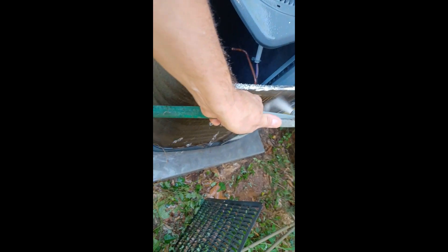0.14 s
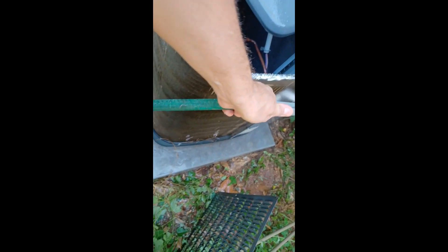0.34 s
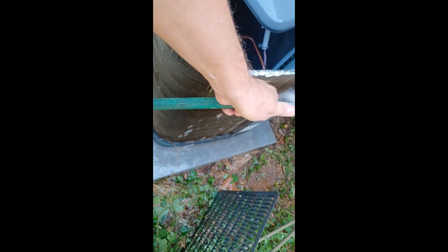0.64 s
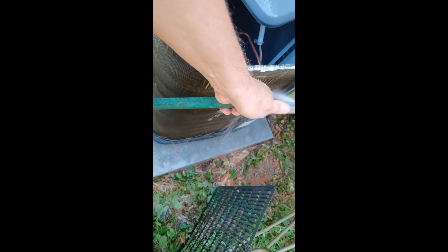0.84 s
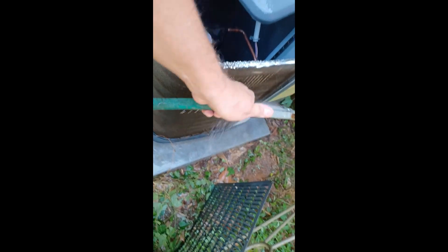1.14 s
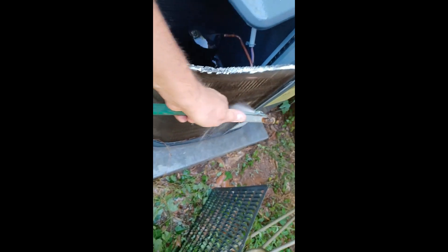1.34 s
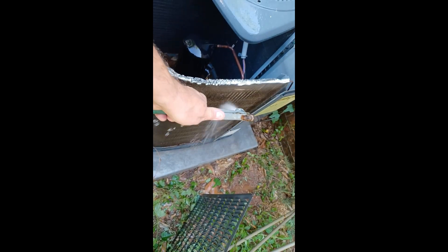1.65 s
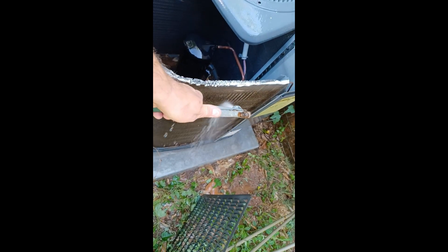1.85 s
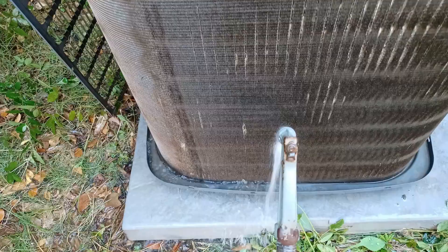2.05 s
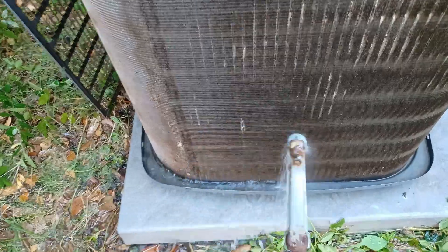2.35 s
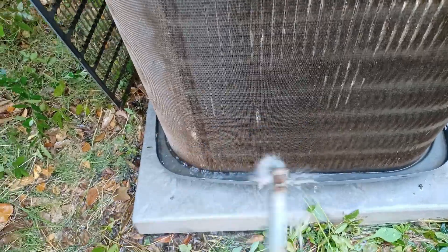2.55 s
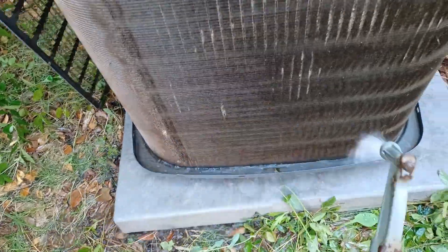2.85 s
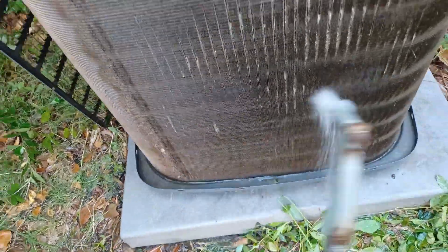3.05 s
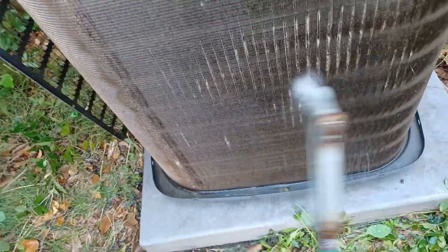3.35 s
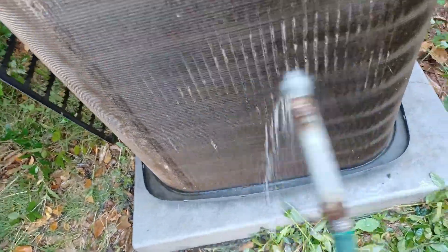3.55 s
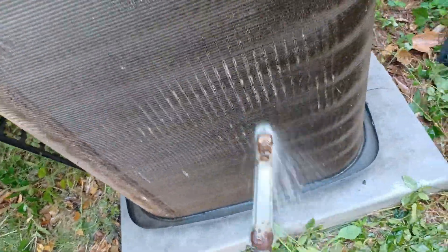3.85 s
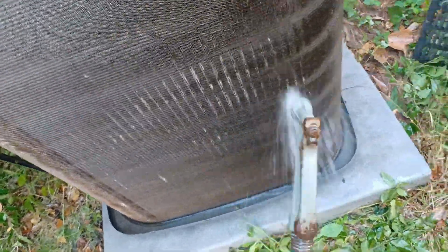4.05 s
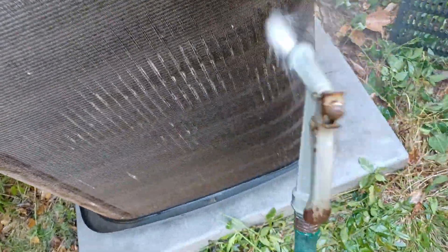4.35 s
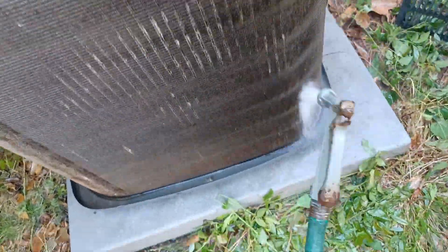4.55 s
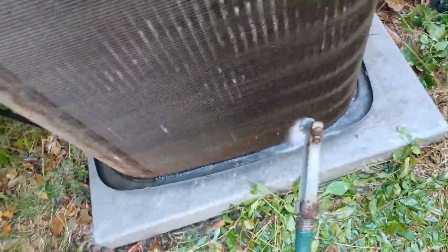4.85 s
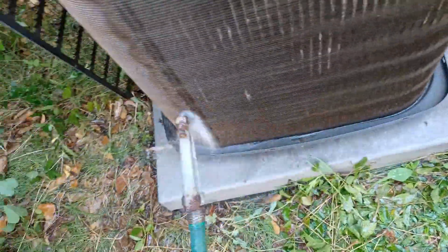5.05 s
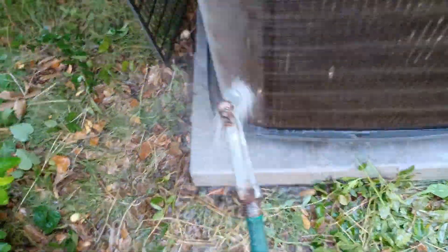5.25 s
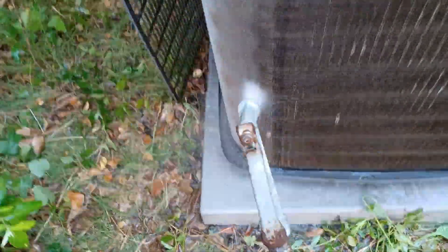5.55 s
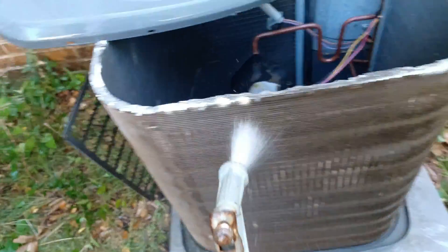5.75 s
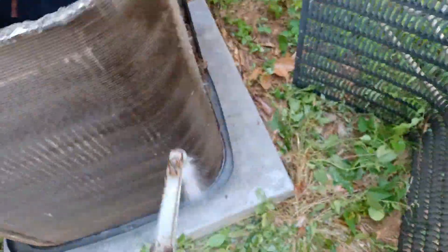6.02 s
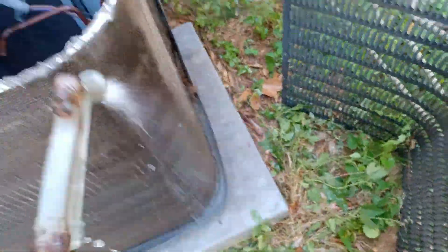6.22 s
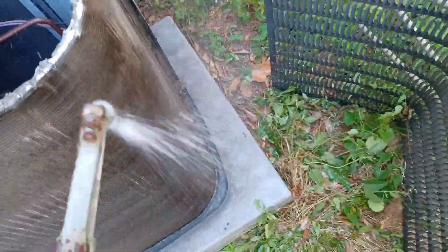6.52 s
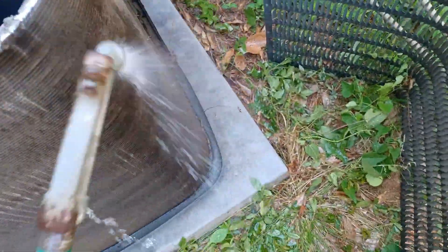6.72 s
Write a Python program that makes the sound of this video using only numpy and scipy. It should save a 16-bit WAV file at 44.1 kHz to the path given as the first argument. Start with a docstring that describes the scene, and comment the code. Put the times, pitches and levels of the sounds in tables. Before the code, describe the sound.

A pressurized water jet hisses steadily over thin metal fins, then sweeps back and forth with splashy swells and brief ringing knocks on a metal tray.

```python
"""A hose jet sweeps the fins and drums on the casing of an outdoor air conditioner, close to a hand-held port pair.
At 2.08 s an edit: a short fade-in, another left-right balance, and a drifting phase between the channels.
From 2.6 s strikes on ribs and base tray ring among the sweeps, loudest in the tray at 5.2 and 5.5 s; sweeps end it.
Random droplets, shaped by metal resonances or splash spectra, make each layer; crossings of edges swell it.
A far machine hums throughout: a wandering tone in low noise, whose level dips at 2.8 and 3.7 s."""
import sys
import numpy as np
from scipy import signal
from scipy.fft import rfft, irfft
from scipy.io import wavfile
from scipy.ndimage import uniform_filter1d

SR = 44100
rng = np.random.default_rng(int(sys.argv[2]) if len(sys.argv) > 2 else 0)


def unload_audio(sound):
    """Save the sound as a 16-bit wav file, at the path given as the first command line argument."""
    columns = np.transpose(np.atleast_2d(sound))
    # keep every value between -1 and 1, then stretch to whole-number steps
    steps = np.round(np.clip(columns, -1, 1) * 32767)
    wavfile.write(sys.argv[1], SR, steps.astype(np.int16))


def natural_amplitude(level_db):
    """Convert a level in decibels to a linear amplitude factor, elementwise."""
    exponent = np.asarray(level_db, float) / 20
    return 10 ** exponent


N = 303408
T = np.arange(N) / SR
HZ = np.fft.rfftfreq(N, 1 / SR)
EDIT_S = 2.0822

# Level of the spray over time; the mist dips abruptly and briefly at 6.42 s.
# Each row: time in seconds, fin ring in dB, mist in dB.
SPRAY_LEVEL = [(0.0, -31.5, -29.5), (0.45, -33.5, -30), (0.7, -32, -28.5), (1.06, -35.5, -29),
               (1.3, -34, -28.5), (2.08, -32.5, -29.5), (2.4, -34.5, -30), (2.7, -38, -32),
               (3.0, -34.5, -31), (3.6, -33.5, -28.5), (3.9, -34, -32.5), (4.45, -32.5, -29),
               (4.75, -36, -32.5), (5.1, -36.5, -33), (5.6, -39.5, -34), (5.82, -38, -33), (5.9, -34, -30),
               (6.38, -34, -30.5), (6.42, -34.5, -42), (6.5, -36, -30), (6.88, -34, -30.5)]
# Resonances of casing, base tray (deep mode first), ribs and fins.
# Each row: frequency in Hz, width in Hz, relative level in dB.
CASING_MODES = [(350, 40, 0), (420, 70, -8)]
TRAY_MODES = [(703, 38, 0), (900, 40, -5), (1010, 45, -2), (1190, 45, 0), (1500, 50, -9)]
RIB_MODES = [(784, 180, -11), (1110, 230, -2.5), (1470, 210, 3.5), (1590, 110, 0.5)]
FIN_MODES = [(1720, 160, -16), (2085, 505, 2), (2376, 75, 0.5), (2597, 210, 1.5), (2850, 61, 2.5),
             (3300, 570, -1.5), (4030, 870, -1)]
# Spectra of water patter, splash and mist. Each row: frequency in Hz, relative level in dB.
PATTER_SPECTRUM = [(300, -31), (500, -7.5), (750, 0.5), (1250, -0.5), (1550, 3), (2200, -12), (4000, -50)]
SPLASH_SPECTRUM = [(1500, -30), (3000, -10.5), (4400, -5.5), (6500, -6), (8300, -7.5), (10500, -16)]
MIST_SPECTRUM = [(6000, -31), (8500, -1), (10500, 4), (12800, 6), (14500, 4), (15400, 2), (16300, -9)]
PATTER_RE_FINS_DB, SPLASH_RE_MIST_DB = -8.5, -1
BOOM_BEFORE_DB, BOOM_AFTER_DB = -47, -52.5  # steady casing boom, either side of the edit
RUNOFF_DB = -51  # steady patter of water running down


def jet():
    """Droplets excite casing, tray, ribs and fins, and hiss as they burst."""
    s, fins_db, mist_db = np.transpose(SPRAY_LEVEL)
    fins = np.interp(T, s, natural_amplitude(fins_db) ** 2)
    mist = np.interp(T, s, natural_amplitude(mist_db) ** 2)
    boom = natural_amplitude(np.where(T < EDIT_S, BOOM_BEFORE_DB, BOOM_AFTER_DB)) ** 2
    patter = fins * natural_amplitude(PATTER_RE_FINS_DB) ** 2
    splash = mist * natural_amplitude(SPLASH_RE_MIST_DB) ** 2
    more_boom, deep, upper, ribs, more_fins, more_splash, more_mist = crossings()
    # strong patter rings the ribs: this share of its power moves to them
    hard = np.clip((10 * np.log10(patter) + 42) / 9, 0, 0.7)
    soft_patter = (1 - hard) * patter + natural_amplitude(RUNOFF_DB) ** 2
    layers = [(boom + more_boom, modes(CASING_MODES)),
              (deep, modes(TRAY_MODES[:1], steep=1.25)),
              (upper, modes(TRAY_MODES[1:], steep=1.1)),
              (ribs + hard * patter, modes(RIB_MODES)),
              (soft_patter, natural_amplitude(read(PATTER_SPECTRUM, HZ))),
              (fins + more_fins, modes(FIN_MODES)),
              (splash + more_splash, natural_amplitude(read(SPLASH_SPECTRUM, HZ))),
              (mist + more_mist, natural_amplitude(read(MIST_SPECTRUM, HZ)))]
    return sum(np.sqrt(power) * droplets(colour) for power, colour in layers)


# The jet drums on the casing.
# Each row: centre in seconds, length in seconds, boom in dB, fin ring in dB, mist in dB.
CASING_SURGES = [(0.909, 0.24, -37.5, -32, -26), (1.159, 0.15, -41.5, -34, -25)]
SURGE_RIBS_RE_FINS_DB, SURGE_SPLASH_RE_MIST_DB = 1, -10
# The jet strikes a rib or the tray. Each row: centre in seconds, length in seconds,
# deep tray mode in dB, upper tray modes in dB, rib ring in dB, fin ring in dB, mist in dB.
RIB_TRAY_STRIKES = [(2.605, 0.12, -70, -55, -36.5, -26.5, -33), (2.74, 0.12, -41, -43, -38.5, -28, -32),
                    (4.832, 0.041, -50, -40.5, -40, -29.5, -34), (4.947, 0.24, -47, -38, -45, -27.5, -36.5),
                    (5.213, 0.041, -21.5, -27.5, -28, -27, -28), (5.408, 0.053, -36, -35, -40, -28, -28),
                    (5.508, 0.067, -26, -25, -26.5, -26.5, -27.5),
                    (6.446, 0.048, -47, -41, -39, -34.5, -29.5), (6.719, 0.038, -59, -50, -35, -30, -30)]
STRIKE_SPLASH_RE_MIST_DB = -6
STRIKE_FLAT, TRAY_FLAT = 1.17, 1.2  # swell overdrive, clipped to a flat top
TRAY_LATER_S, TRAY_LENGTH_SHARE = 0.0055, 0.83  # the jet reaches the tray later, for part of a strike
# The wagging jet sweeps the fins. Each row: centre in seconds, length in seconds, fin ring in dB, mist in dB.
FIN_SWEEPS = [(0.17, 0.095, -35.5, -44), (0.569, 0.021, -50, -24.5), (0.618, 0.052, -29.5, -38),
              (0.667, 0.053, -33, -33), (0.828, 0.075, -46, -28.5), (1.277, 0.08, -52, -31),
              (1.526, 0.19, -42, -37), (2.47, 0.062, -28.5, -47), (2.91, 0.15, -41, -42),
              (3.064, 0.1, -34, -32), (3.393, 0.075, -34.5, -32), (3.737, 0.16, -35, -31),
              (3.867, 0.073, -35, -28.5), (3.953, 0.12, -34, -31.5), (4.07, 0.074, -38, -27.5),
              (4.167, 0.083, -35, -30.5), (4.27, 0.1, -31, -31.5), (4.39, 0.12, -34, -34),
              (4.49, 0.096, -36, -34), (5.29, 0.069, -36, -36), (5.327, 0.031, -27, -35),
              (6.195, 0.066, -33.5, -44), (6.31, 0.12, -36, -34), (6.54, 0.055, -32.5, -32),
              (6.63, 0.099, -34, -30.5), (6.799, 0.015, -27, -29)]
SWEEP_RIBS_RE_FINS_DB, SWEEP_SPLASH_RE_MIST_DB = -11.5, -0.5
SPUTTER_RMS_DB = 1.5  # the jet breaks up while it crosses an edge


def crossings():
    """Power of boom, deep and upper tray, ribs, fins, splash, mist; each swell stops a little faster than it grows."""
    power = np.zeros((7, N))

    def cross(s, length, heights, flat=1.0):
        near = slice(max(round((s - length) * SR), 0), round((s + length) * SR))
        progress = np.clip((T[near] - s) / length + 0.46, 0, 1) ** 1.2
        swell = np.clip(flat * np.sin(np.pi * progress), 0, 1)
        power[:, near] += np.array(heights)[:, None] ** 2 * swell ** 2

    for s, length, *db in CASING_SURGES:
        boom, fins, mist = natural_amplitude(db)
        ribs, splash = fins * natural_amplitude(SURGE_RIBS_RE_FINS_DB), mist * natural_amplitude(SURGE_SPLASH_RE_MIST_DB)
        cross(s, length, [boom, 0, 0, ribs, fins, splash, mist])
    for s, length, *db in RIB_TRAY_STRIKES:
        deep, upper, ribs, fins, mist = natural_amplitude(db)
        splash = mist * natural_amplitude(STRIKE_SPLASH_RE_MIST_DB)
        cross(s + TRAY_LATER_S, length * TRAY_LENGTH_SHARE, [0, deep, upper, 0, 0, 0, 0], TRAY_FLAT)
        cross(s, length, [0, 0, 0, ribs, fins, splash, mist], STRIKE_FLAT)
    for s, length, *db in FIN_SWEEPS:
        fins, mist = natural_amplitude(db)
        ribs, splash = fins * natural_amplitude(SWEEP_RIBS_RE_FINS_DB), mist * natural_amplitude(SWEEP_SPLASH_RE_MIST_DB)
        cross(s, length, [0, 0, 0, ribs, fins, splash, mist])
    sputter = np.array([slow(count=N, size=250) for _ in power])
    return power * natural_amplitude(SPUTTER_RMS_DB * sputter) ** 2


# Likeness of the two ports. Each row: frequency in Hz, correlation from 0 to 1.
PORT_LIKENESS = [(100, .95), (250, .96), (600, .87), (1200, .8), (2200, .55), (2700, .93), (3200, .95),
                 (3800, .6), (5000, .7), (6500, .75), (7800, .92), (8600, .85), (9500, .45), (13000, .3)]
DROPS_PER_S, DROP_SPREAD_DB = 14000, 2.0


def droplets(colour):
    """A dense rain of impacts of uneven size, for two ports that hear partly the same drops."""
    size = natural_amplitude(DROP_SPREAD_DB * np.minimum(rng.exponential(1, (2, N)), 5))
    falls = rng.random((2, N)) < DROPS_PER_S / SR
    shared, other = rfft(size * rng.standard_normal((2, N)) * falls)
    same = np.clip(read(PORT_LIKENESS, HZ), 0, 1)
    second = same * shared + np.sqrt(1 - same ** 2) * other
    return evened(irfft(colour * np.array([shared, second]), N))


def modes(table, steep=0.87):
    """Magnitude of a set of resonances, summed in power; steep sets the fall of the skirts."""
    return np.sqrt(sum(natural_amplitude(db) ** 2 / (1 + (2 * (HZ - hz) / width) ** 2) ** steep
                       for hz, width, db in table))


# Noise of the far machine. Each row: frequency in Hz, relative level in dB.
HUM_SPECTRUM = [(25, -55), (45, -27), (80, -6), (105, -2.5), (120, -12), (140, 1.5), (190, -9), (245, -1.5),
                (300, -11.5), (450, -68)]
# Level of the hum as heard, with brief dips at 2.8 and 3.7 s, before a small random variation.
# Each row: time in seconds, level in dB.
HUM_HEARD_LEVEL = [(0.0, -47.5), (1.3, -45.5), (2.6, -45.5), (2.8, -55), (3.03, -45.5), (3.55, -44),
                   (3.7, -53.5), (4.2, -45.5), (5.35, -49.5), (5.9, -47.5), (6.88, -44)]
HUM_HZ, HUM_WANDER_SHARE, HUM_VARY_DB = 120, 0.0393, -0.5  # mean pitch, rms pitch wander, level variation


def hum():
    """A rough low drone around an unsteady tone; its heard level follows a table with dips, varied a little at random."""
    pitch_hz = HUM_HZ * (1 + HUM_WANDER_SHARE * slow(count=N, size=1500))
    tone = np.sin(2 * np.pi * np.cumsum(pitch_hz) / SR)
    level_db = np.interp(T, *np.transpose(HUM_HEARD_LEVEL)) + HUM_VARY_DB * slow(count=N, size=3000)
    return natural_amplitude(level_db) * (tone + droplets(natural_amplitude(read(HUM_SPECTRUM, HZ))))


def evened(x):
    """Scales to rms 1."""
    return x / np.sqrt(np.mean(abs(x) ** 2) + 1e-20)


def read(points, hz):
    """A spectrum table, straight on a log-frequency axis."""
    f, value = np.transpose(points)
    return np.interp(np.log(hz + 1), np.log(f + 1), value)


def slow(count, size):
    """Smooth random wander, rms 1; size in points."""
    return evened(uniform_filter1d(uniform_filter1d(rng.standard_normal(count), size=size), size=size))


def patches(shape, bins, frames):
    """A smooth random field over frequency and time, rms 1."""
    field = rng.standard_normal(shape)
    for _ in range(2):
        field = uniform_filter1d(uniform_filter1d(field, bins, 0), frames, 1)
    return evened(field)


# A thin band in the treble wanders, and spreads while the nozzle swings; values before the shake.
# Each row: time in seconds, centre in Hz, depth in dB, half-width as a share of the centre.
THIN_BAND = [(0, 7860, -1, .1), (.15, 7700, -4, .1), (.3, 8300, -4.5, .14), (.45, 7900, -3, .14),
             (.54, 8000, -1.5, .12), (.57, 6300, -6, .3), (.6, 8600, -5, .08), (.71, 8500, -5, .1),
             (.74, 7500, -3, .2), (.82, 7600, -3.5, .15), (.87, 5900, -8, .28), (.92, 5600, -6, .18),
             (.96, 7600, -8, .12), (1.01, 7900, -5, .1), (1.07, 6900, -6, .12), (1.14, 5600, -5, .25),
             (1.18, 6400, -6, .14), (1.27, 7600, -9, .1), (1.4, 7850, -5, .08), (1.67, 7700, -5, .14),
             (1.85, 7850, -4, .08), (1.9, 7800, -1.5, .1), (2.07, 7850, -1, .1), (2.1, 4600, -3, .14),
             (3.7, 4200, -3, .14), (4.5, 4100, -3, .12), (5.6, 4200, -3, .14), (6.88, 4100, -4, .12)]
HAND_SHAKE = rng.standard_normal((2, 300))  # trembling hand, about 45 random points a second
CENTRE_SHAKE_SHARE, DEPTH_FLICKER_SHARE = 0.045, 0.4


def hollow(t):
    """Centre, depth and width of the thin band, shaken by the hand."""
    s, *columns = np.transpose(THIN_BAND)
    centre_hz, depth_db, share = (np.interp(t, s, c) for c in columns)
    move, flicker = (np.interp(t, np.linspace(0, T[-1], len(c)), c) for c in HAND_SHAKE)
    centre_hz = centre_hz * (1 + CENTRE_SHAKE_SHARE * move)
    depth_db = depth_db * np.clip(1 + DEPTH_FLICKER_SHARE * flicker, 0, 2)
    return centre_hz, depth_db, share


# Brief lifts of one frequency region; 0 dB leaves it unchanged.
# Each row: centre in seconds, length in seconds, frequency in Hz, width in Hz, lift in dB.
REGION_LIFTS = [(.25, 0.38, 2450, 600, 2.5), (0.616, 0.05, 1520, 200, 13), (0.924, .08, 350, 120, 6),
                (0.972, 0.063, 4600, 2000, 7), (1.2, 0.053, 4800, 2000, 5), (2.475, .05, 2100, 300, 7),
                (2.48, .04, 3200, 300, 8), (2.59, .04, 2100, 300, 4), (2.627, 0.049, 1540, 250, 11),
                (2.628, 0.036, 2790, 200, 9), (2.725, 0.017, 2280, 400, 8), (2.77, 0.069, 2340, 300, 6),
                (2.77, .06, 3800, 400, 0), (4.4, .4, 2340, 800, 2.5), (5.22, .04, 1200, 150, 8.5),
                (5.88, 0.07, 3000, 2000, 0), (4.945, 0.13, 2100, 350, 4.5), (5.197, 0.032, 2350, 300, 14),
                (5.406, .05, 2600, 300, 4), (5.522, .05, 2090, 400, 8), (6.71, 0.035, 1720, 200, 11)]
PATCH_RMS_DB, FLICKER_RMS_DB = 0.73, 0.68  # small patches of colour, wide flicker


def scene():
    """The spray thickens and thins in small patches and has a thin treble band; the drone lies under it."""
    hz, t, z = signal.stft(jet(), SR, nperseg=512, noverlap=384)
    hz = hz[:, None]
    small = PATCH_RMS_DB * patches(z.shape[1:], bins=5, frames=16)
    wide = FLICKER_RMS_DB * patches(z.shape[1:], bins=120, frames=3)
    z *= natural_amplitude(small + wide)
    for s, length, lift_hz, width, lift_db in REGION_LIFTS:
        z *= natural_amplitude(lift_db * np.exp(-(2 * (hz - lift_hz) / width) ** 2 - (2 * (t - s) / length) ** 2))
    centre_hz, depth_db, share = hollow(t)
    z *= natural_amplitude(depth_db * np.exp(-((hz / centre_hz - 1) / share) ** 2))
    spray = signal.istft(z, SR, nperseg=512, noverlap=384)[1][:, :N]
    return spray + hum()


# Port balance before and after the edit. Each row: frequency in Hz, left minus right in dB.
BALANCE_BEFORE = [(100, -2), (350, 0), (600, 2), (1000, -3), (1600, -4), (2100, -3.5), (2500, -7),
                  (2900, 4), (3300, -1), (3800, 1.5), (4700, -0.5), (6200, 1), (8000, 0.5), (10000, -8.5),
                  (13500, -0.5), (15700, -7)]
BALANCE_AFTER = [(100, -4.5), (500, -0.5), (900, -5), (1500, -5), (1900, -8), (2300, -9.5), (3200, -6),
                 (4300, -0.5), (5200, 0.5), (6800, -2.5), (8500, -2), (11000, -4.5), (13500, -1.5),
                 (15700, -4)]
# The jet moves across; -2 dB is neutral. Each row: time in seconds, left minus right in dB.
JET_ACROSS = [(0.0, -4), (1.22, -5.5), (2.2, -2), (4.5, -2), (4.92, -3.5), (5.6, -1.5), (6.48, -1),
              (6.88, 0.5)]


def port_balance_db(hz, t, after):
    """Shading between the ports; the move of the jet counts fully from 1500 Hz up."""
    across_db = np.interp(t, *np.transpose(JET_ACROSS)) + 2
    still_db = np.where(after, read(BALANCE_AFTER, hz), read(BALANCE_BEFORE, hz))
    return still_db + across_db * np.clip(hz / 1500, 0, 1)


# Phase scatter of a wide source. Each row: frequency in Hz, rms scatter in radians before the width factor.
PHASE_SCATTER = [(200, .1), (800, .5), (2100, .9), (2700, .35), (3300, .3), (3800, 1.2), (6500, 1.5),
                 (8800, 1.8), (14000, 2.5)]
# The spray's width varies, widest at 0.6 to 1.0 s, narrowest by 2.08 s.
# Each row: time in seconds, factor on the scatter above 2500 Hz.
SPRAY_WIDTH = [(0, 1.9), (.53, 1.5), (.6, 2.6), (1.0, 2.4), (1.05, 1.0), (1.13, 1.8), (1.24, 1.0),
               (1.35, 1.8), (1.55, 1.3), (1.7, .6), (2.08, .4)]
# Lead of the left port on top of the delay. Each row: frequency in Hz, lead in radians.
LEFT_PHASE_LEAD = [(300, 0.01), (550, -0.066), (800, -1.1), (1100, 0.036), (1500, -0.99), (2000, -1.3),
                   (2300, -.5), (2600, 0.15), (2900, .05), (3200, -.5), (3500, -.9), (3900, -.3), (4500, 0)]
# Delay of the right port as the hand turns, before the shake. Each row: time in seconds, lag in ms.
RIGHT_PORT_LAG = [(0, .17), (1.6, .17), (1.7, .16), (1.82, .175), (1.92, .155), (1.99, .145), (2.03, .18),
                  (2.08, .17)]
LAG_SHAKE_RMS_MS = 0.012
OPPOSED, OPPOSED_WIDTH_SHARE = 0.55, 0.6  # pull to opposite phase; its width against the thin band's


def port_phase(hz, t, shape):
    """Phase of the right port before the edit; in the thin band it is pulled toward the opposite."""
    width = np.where(hz > 2500, np.interp(t, *np.transpose(SPRAY_WIDTH)), 1)
    scatter = read(PHASE_SCATTER, hz) * width * patches(shape, bins=4, frames=7)
    lag_ms = np.interp(t, *np.transpose(RIGHT_PORT_LAG)) + LAG_SHAKE_RMS_MS * slow(count=len(t), size=12)
    phase = scatter - read(LEFT_PHASE_LEAD, hz) - 2 * np.pi * hz * lag_ms / 1000
    centre_hz, depth_db, share = hollow(t)
    band = np.exp(-((hz / centre_hz - 1) / (OPPOSED_WIDTH_SHARE * share)) ** 2)
    pull = OPPOSED * np.clip(-depth_db / 5, 0, 1) * band
    return np.angle((1 - pull) * np.exp(1j * phase) - pull)


# Cavity behind the left and right port, before shake and facing.
# Each row: frequency in Hz, width in Hz, boost as a factor.
PORT_CAVITIES = [(3120, 170, 0.99), (2750, 840, 0.78)]
# The left port turns to and from the spray. Each row: time in seconds, factor on its boost before the edit.
LEFT_FACING = [(0, 0.51), (.5, 0.54), (.6, 1.8), (.72, 0.77), (.85, 1.1), (1.0, 1.5), (1.06, .7),
               (1.2, 1.6), (1.35, 0.67), (1.6, .6), (2.08, .4)]
FACING_AFTER = 0.078  # after the edit both ports are turned from the spray and ring less
CAVITY_SHAKE_SHARE = 0.05  # rms pitch shift of the cavities as the hand trembles


def ring_cavities(z, hz, t, after):
    """Each port's cavity adds a resonance whose pitch shakes, in place."""
    facings = [np.interp(t, *np.transpose(LEFT_FACING)), 1]
    for port, (cavity_hz, width, boost), facing in zip(z, PORT_CAVITIES, facings):
        shaken_hz = cavity_hz * (1 + CAVITY_SHAKE_SHARE * slow(count=len(t), size=5))
        port *= 1 + boost * np.where(after, FACING_AFTER, facing) / (1 + 2j * (hz - shaken_hz) / width)


def roll_off(x):
    """The treble ends steeply here."""
    return signal.sosfilt(signal.butter(12, 17080, fs=SR, output="sos"), x)


FADE_IN_S = 0.02
LOW_CUT_HZ, TOP_HZ = 57, 15790


def record(dry):
    """Two ports with cavities, delay and shading; the edit with fade-in and drifting phase; band limits."""
    hz, t, z = signal.stft(dry, SR, nperseg=1024, noverlap=768)
    after, hz = t > EDIT_S, hz[:, None]
    shape = z.shape[1:]
    balance_db = port_balance_db(hz, t, after)
    phase = port_phase(hz, t, shape)
    drift = np.angle(patches(shape, bins=2, frames=6) + 1j * patches(shape, bins=2, frames=6))
    ring_cavities(z, hz, t, after)
    z[0] *= natural_amplitude(balance_db / 2)
    z[1] *= natural_amplitude(-balance_db / 2) * np.exp(1j * np.where(after, drift, phase))
    ports = signal.istft(z, SR, nperseg=1024, noverlap=768)[1][:, :N]
    fade_in = np.clip(0.085 + (T - EDIT_S) / FADE_IN_S, 0, 1) ** 2.65
    ports *= np.where(T < EDIT_S, 1, fade_in)
    low_pass = signal.firwin(2047, TOP_HZ, window=("kaiser", 8), fs=SR)
    ports = signal.oaconvolve(ports, low_pass[None], "same")
    ports = signal.sosfilt(signal.butter(3, LOW_CUT_HZ, "high", fs=SR, output="sos"), ports)
    return roll_off(ports)


dry = scene()
out = record(dry)
unload_audio(out)
```